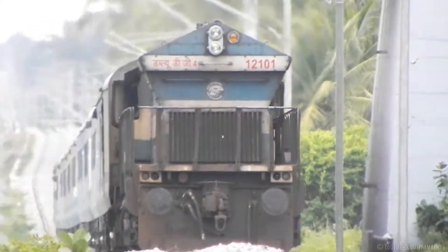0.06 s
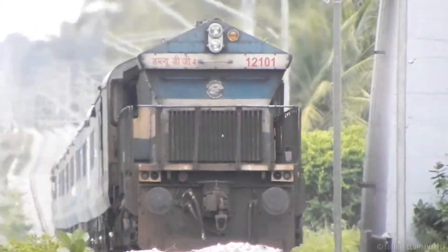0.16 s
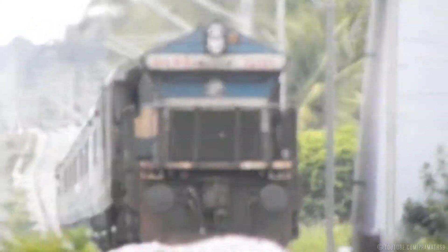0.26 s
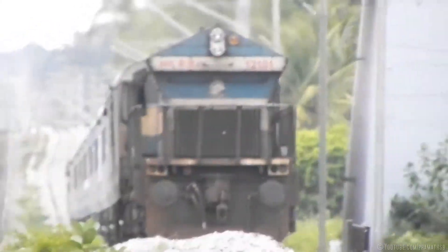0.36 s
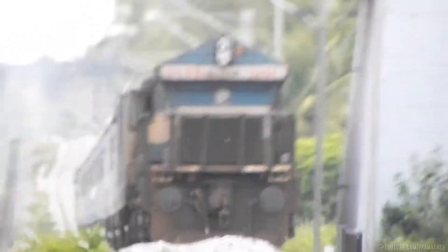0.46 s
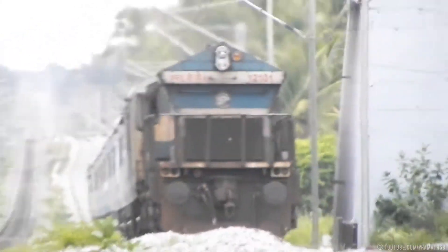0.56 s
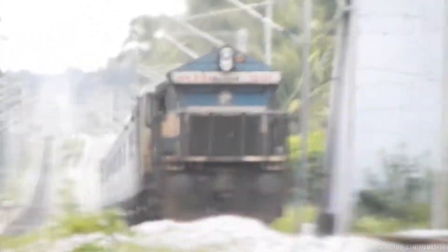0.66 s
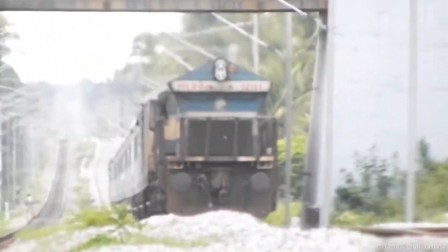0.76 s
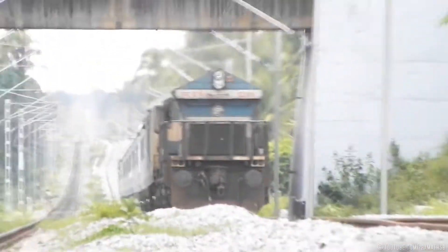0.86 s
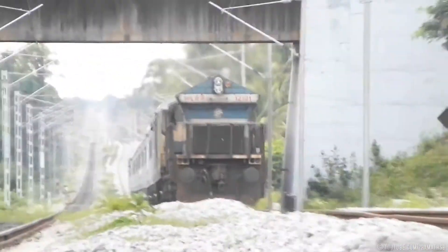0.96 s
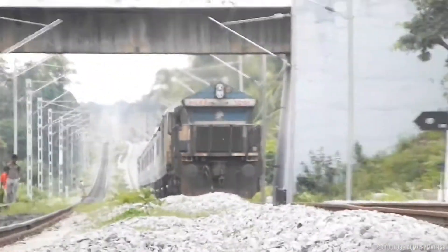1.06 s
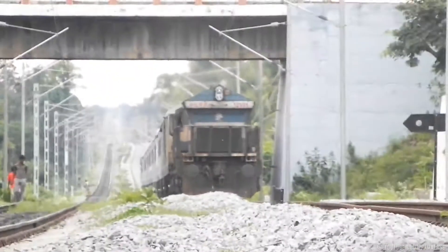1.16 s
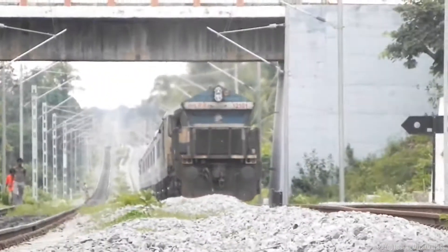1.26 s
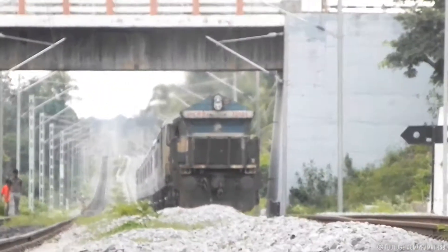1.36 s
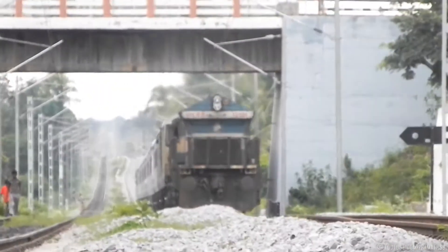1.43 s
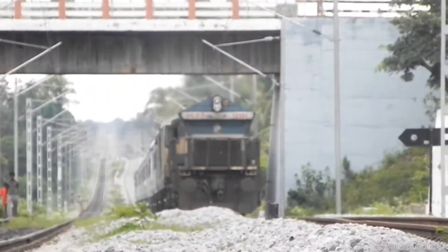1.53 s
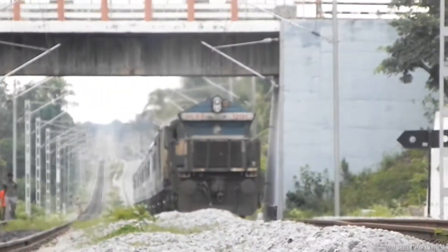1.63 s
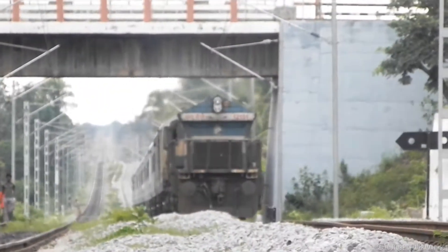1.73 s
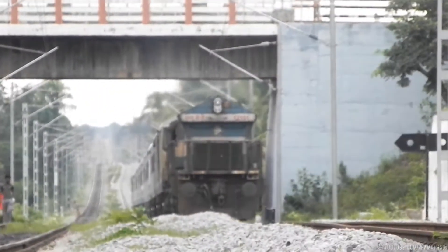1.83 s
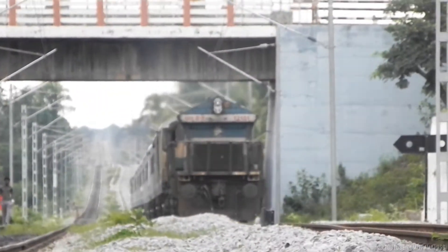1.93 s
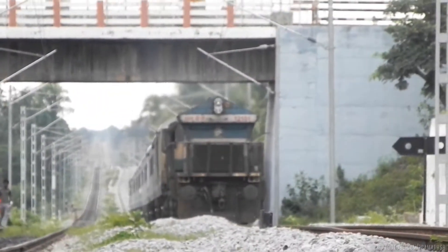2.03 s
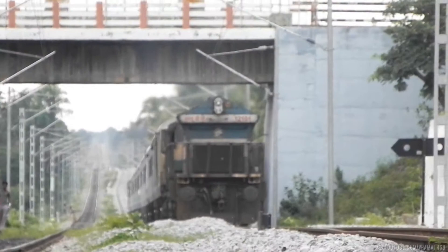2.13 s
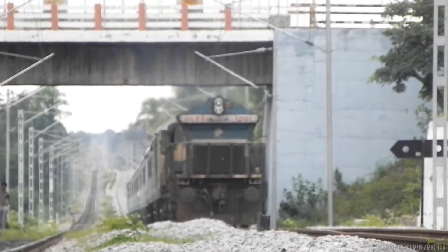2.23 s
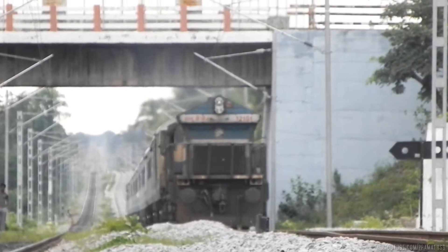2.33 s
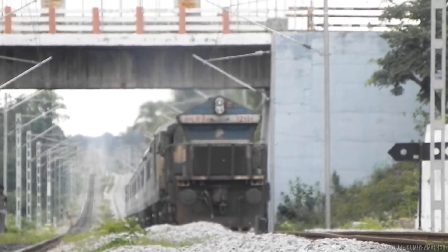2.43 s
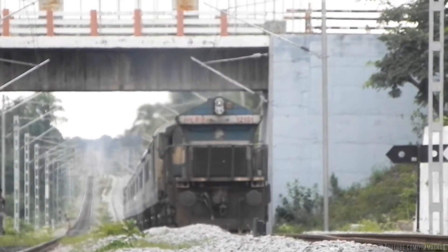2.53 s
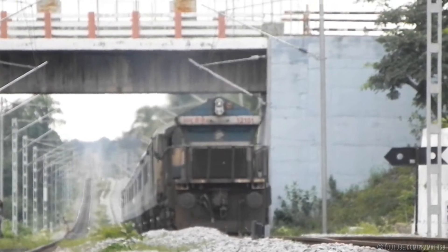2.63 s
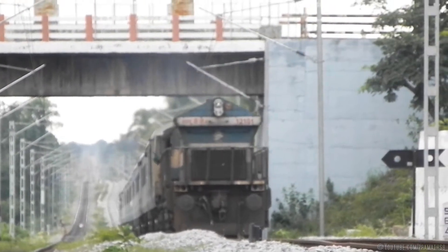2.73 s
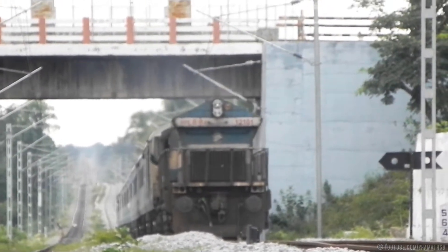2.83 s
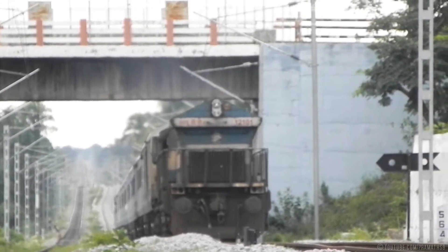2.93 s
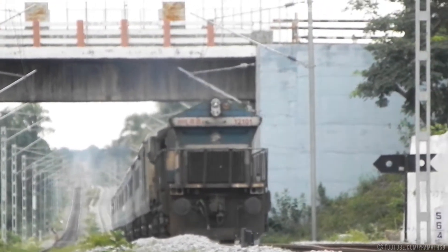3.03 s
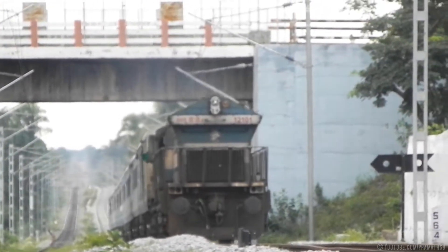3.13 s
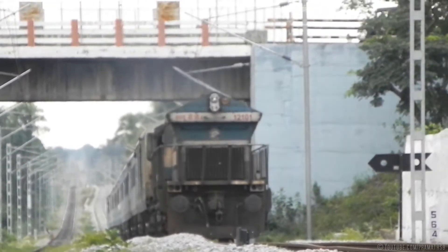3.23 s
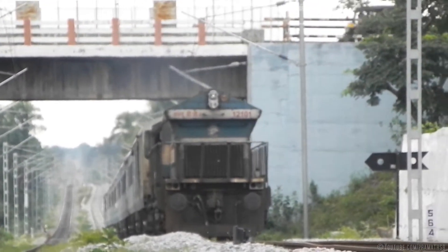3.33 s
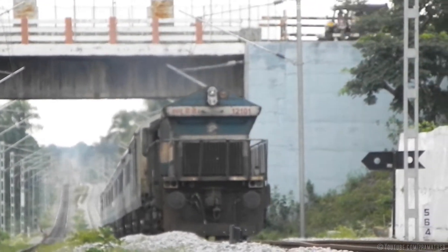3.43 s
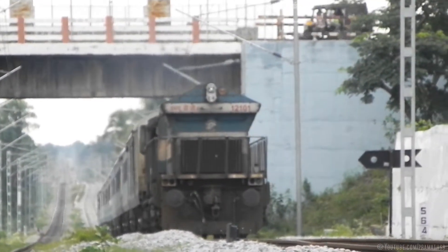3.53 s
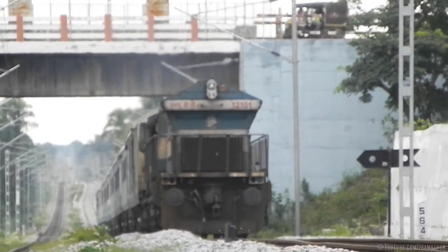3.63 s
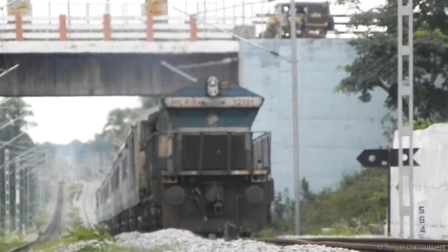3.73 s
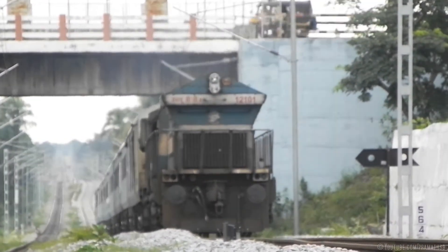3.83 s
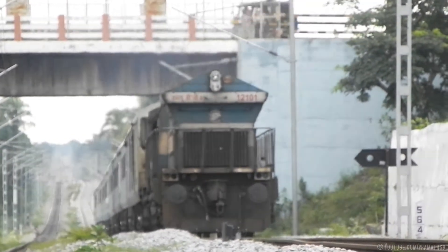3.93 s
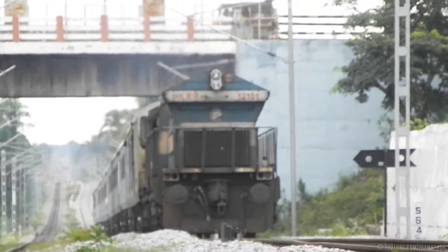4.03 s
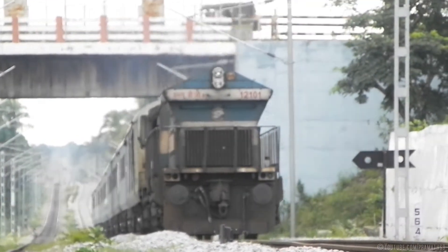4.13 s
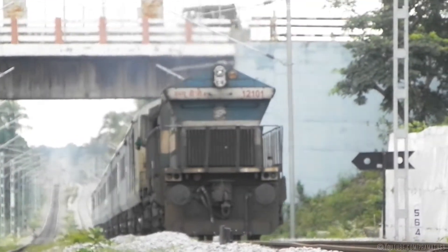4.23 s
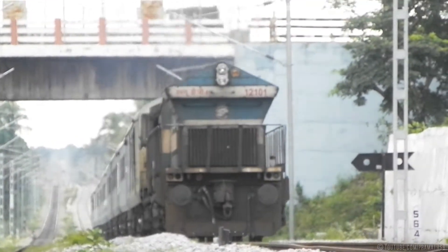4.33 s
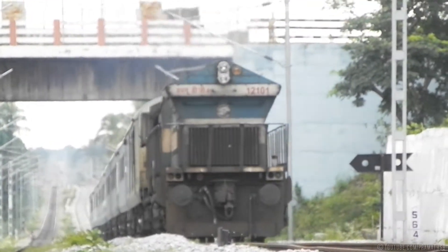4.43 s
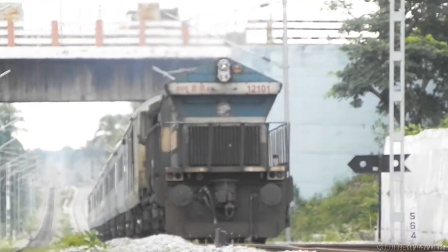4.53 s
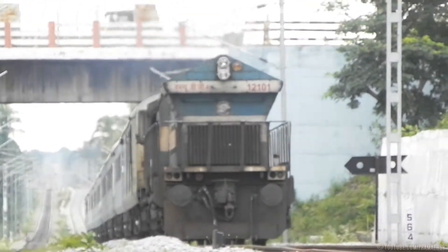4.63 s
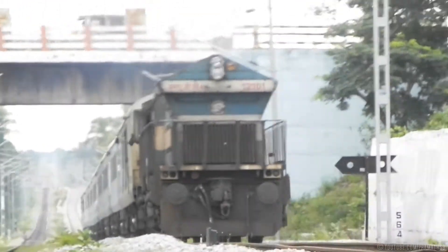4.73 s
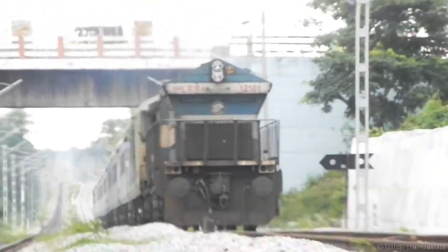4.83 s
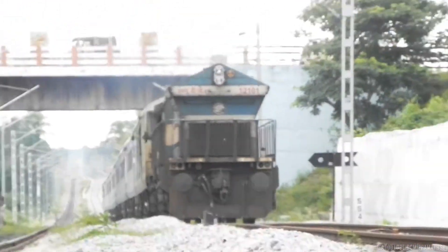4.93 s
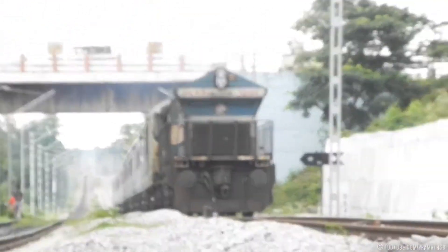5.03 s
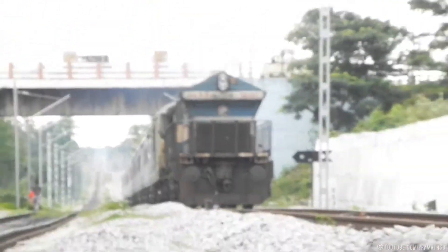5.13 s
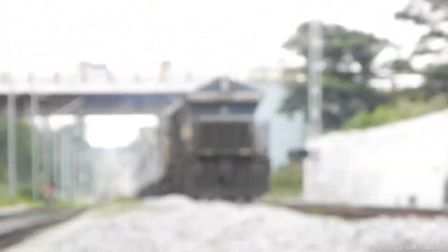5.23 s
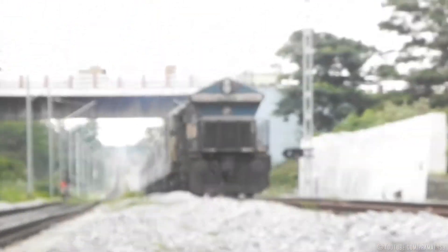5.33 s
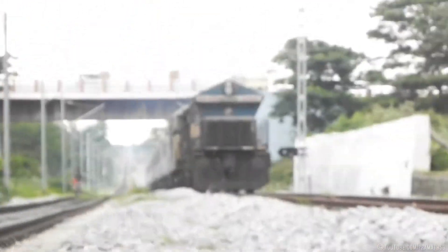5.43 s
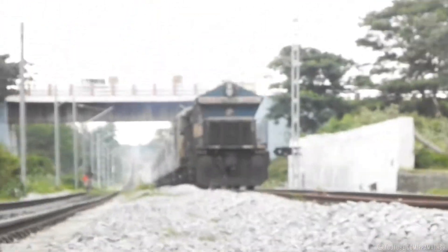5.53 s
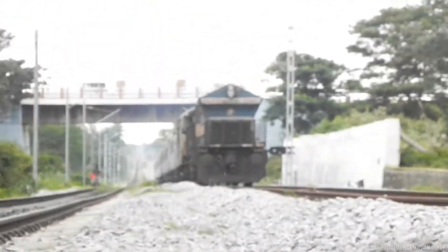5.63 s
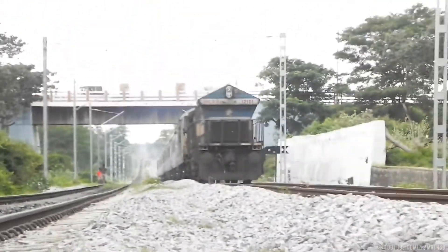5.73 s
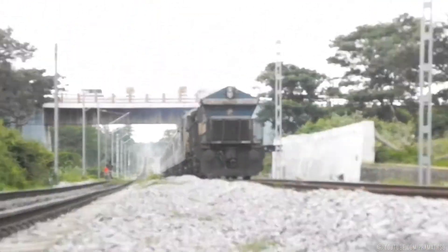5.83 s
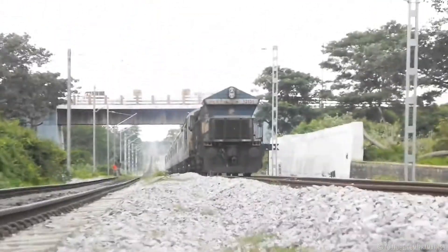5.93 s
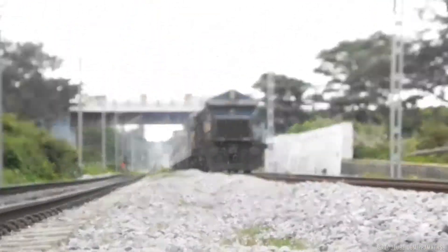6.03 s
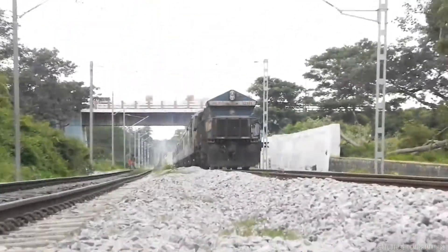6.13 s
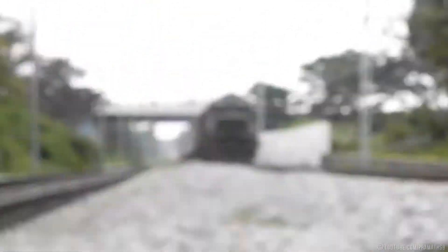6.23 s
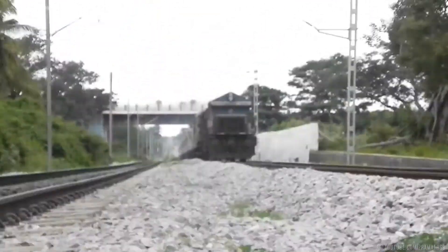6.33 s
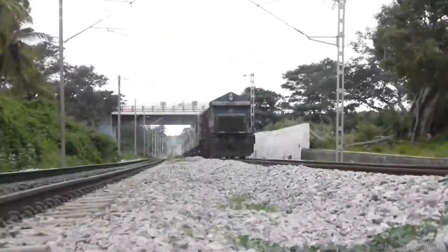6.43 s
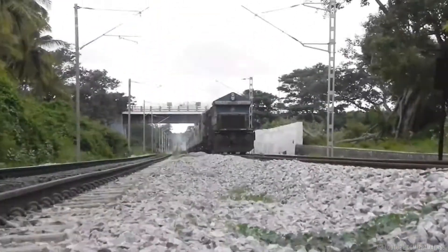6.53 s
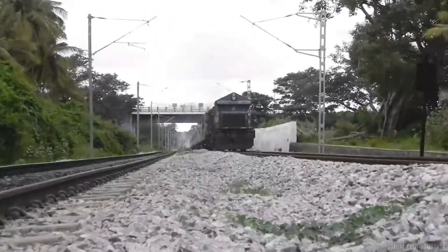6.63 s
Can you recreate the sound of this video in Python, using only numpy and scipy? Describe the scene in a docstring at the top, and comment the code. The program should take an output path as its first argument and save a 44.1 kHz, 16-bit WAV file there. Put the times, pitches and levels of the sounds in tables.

```python
"""On an open railway line a diesel locomotive drums closer, head on to a camera on the ballast.
Sums of crank harmonics make the exhaust beat; shaped noise makes the roar, wheel rush and rail hiss.
Wavering sines make whines of fans, gears and the zoom motor; noise bursts and dying modes make the lens
tick, click and scrape, and noise the rub of a hand on it. Two birds call faintly as gliding, echoing sines.
"""
import sys
import numpy as np
from scipy import signal
from scipy.fft import rfft, irfft, next_fast_len
from scipy.io import wavfile

SR = 44100
rng = np.random.default_rng(int(sys.argv[2]) if len(sys.argv) > 2 else 0)


def log_audio(samples):
    """Write samples as a 16-bit WAV file to the path given in sys.argv[1]."""
    # one column per channel
    frames = np.atleast_2d(samples).T
    # limit to full scale, then quantise
    limited = np.clip(frames, -1, 1)
    pcm = np.round(limited * 32767).astype(np.int16)
    wavfile.write(sys.argv[1], SR, pcm)


N = 294499
TIME = np.arange(N) / SR

# All noise spectra are relative: each noise is scaled to rms 1 before its layer's level applies.

# exhaust harmonics: crank_multiple, far_db, near_db (relative)
CRANK_ORDERS = [(3, -35, -20), (4, -5.5, -21), (5, -14, -5), (6, -6.5, 3), (7, -13, 5), (8, 3, 13),
                (9, -3, -2), (10, -2, -7), (12, -26, -15), (13, -16.5, -24)]
# gas rumble between the harmonics: frequency_hz, density_db_per_hz
RUMBLE_SPECTRUM = [(10, -40), (28, -40), (55, 0), (75, -10), (100, -2), (125, 1.5), (150, -3.5),
                   (170, -13.5), (190, -6), (215, -17), (260, -15), (400, -58), (900, -87)]
# the train's weight on the track: frequency_hz, density_db_per_hz
GROUND_SPECTRUM = [(10, -36), (28, -29), (52, -6), (65, 0.5), (90, -4), (200, -46), (600, -110)]
# deep bass of the track: time_s, level_db
GROUND_LEVEL = [(0, -37), (.6, -40), (.9, -31), (1.6, -39), (3.2, -38), (4.6, -31.5), (5.7, -29),
                (6.1, -35), (6.68, -35)]
# engine roar: frequency_hz, density_db_per_hz
ROAR_SPECTRUM = [(100, 11.5), (220, -8.5), (270, -2), (330, 0.5), (400, -14.5), (530, 9), (620, -2.5),
                 (760, 5), (920, 1), (1150, 6), (1400, 1.5), (1800, -13), (2600, -40), (6000, -67)]
# mean level of the roar: time_s, level_db
ROAR_LEVEL = [(0, -40.5), (.65, -38.5), (1.28, -32), (1.6, -33.5), (2.1, -38.5), (2.5, -37), (3.1, -35),
              (4.5, -32.5), (5.1, -32.5), (5.5, -29), (5.78, -25), (6.15, -25.5), (6.68, -25)]
# rush of fans and wheels: frequency_hz, density_db_per_hz
RUSH_SPECTRUM = [(150, 0.5), (300, 4.5), (400, 13.5), (550, 6), (610, -11), (900, -16), (1300, 2.5),
                 (2000, 3), (2900, 1), (4200, -4.5), (5300, -11), (6600, -9.5), (7600, -21), (15000, -54)]
# rail hiss: frequency_hz, density_db_per_hz
HISS_SPECTRUM = [(2000, -14), (5000, -9), (8500, 11.5), (10500, 4.5), (12000, 0), (14000, 3.5),
                 (16000, -10)]
# scatter from trees and walls: frequency_hz, density_db_per_hz
SCATTER_SPECTRUM = [(40, 9), (150, -10), (240, -9), (330, 3.5), (450, 9.5), (650, 0), (1300, 10), (1500, 0),
                    (2500, -5.5), (4000, -8.5), (6500, -17), (8000, -23.5), (11000, -38.5), (16000, -47)]
# slow swells, one arch each: start_s, length_s
SWELLS = [(0.35, 2.13), (4.572, 3.27)]
# bands that open and glide with the swells: crest_hz, width_octaves, depth_db, glide_octaves,
# deepest_arch_height (0-1), brevity (exponent: higher opens more briefly)
HOLLOWS = [(415, .16, 12, -.76, .86, 3), (1915, .33, 5.5, .99, .6, 3), (2020, .11, 11, .8, .73, 36),
           (5560, .14, 7, -.097, 1, 2)]
# whines and hums of fans, gears and the zoom motor:
# pitch_hz, waver_hz, mean_level_db, start_s, end_s, side_share_db
WHINES = [(121, 3, -32, .72, 1.5, -20), (186, 1.5, -44, 1.05, 1.9, -20), (480, 1.8, -48.5, 1.08, 4.85, 1),
          (531, 3.5, -47, 2.25, 5.9, -1), (530, 5, -43, 5.5, 8, -3), (563, 2.5, -52, 1.1, 7, -4),
          (755, 2.5, -40.5, 5.5, 8, -10), (960, 2, -51, 1, 3.1, -10), (1098, 2.2, -47.5, .95, 5.7, 2),
          (1095, 2.8, -39, 5.35, 8, -6)]
# loud lens ticks: start_s, knock_db, centre_hz, snap_db
TICKS = [(.015, -16.5, 890, -35.5), (.062, -14.5, 850, -38), (.124, -13, 700, -35), (.159, -15, 840, -33),
         (.209, -20, 895, -40), (.231, -16.5, 840, -33), (.256, -14.5, 840, -33), (.333, -21.5, 1000, -31),
         (.357, -16, 800, -21), (.37, -17.5, 670, -32), (.423, -15, 620, -37), (.446, -17, 550, -35),
         (.615, -18, 403, -32), (.946, -20, 980, -38), (1.453, -19, 1090, -32), (3.066, -20.5, 1230, -45),
         (4.86, -21, 2120, -27), (4.876, -12.5, 1560, -28), (4.896, -14, 646, -34), (4.958, -26, 1500, -33),
         (4.972, -18.5, 615, -36), (5.002, -16.5, 830, -27.5), (5.024, -25, 750, -40),
         (6.289, -11.5, 826, -32), (6.52, -9.5, 880, -27)]
# modes of the lens barrel: frequency_hz, level_db (relative), t60_s
BARREL_MODES = [(350, 13, 0.014), (416, -9, 0.014), (546, -5.5, 0.042), (670, -9, 0.0048), (742, -7, 0.026),
                (1090, -12, 0.015), (1300, 7, 0.018), (1634, 5.5, 0.019), (2550, -15, 0.014)]
# snap of a tick: frequency_hz, density_db_per_hz
SNAP_SPECTRUM = [(600, -30), (1800, 14), (3000, 15), (3650, 16), (4500, 7), (6500, 5.5), (9000, -7.5),
                 (13000, -11), (16000, -34)]
# dry part of a knock: frequency_hz, density_db_per_hz
CLACK_SPECTRUM = [(150, -23), (350, -4), (520, 15), (640, -3), (810, 8), (1000, -21), (1350, 7), (1700, -3),
                  (4000, -22), (9000, -60)]
# clicks of the zoom ring's ratchet: start_s, knock_db, ring_db, snap_db
CLICKS = [(0.673, -46, -45, -30), (.749, -31, -40, -43), (0.798, -27, -35, -36), (.857, -28, -36, -41),
          (0.909, -25, -40, -36), (.948, -23, -38, -36), (0.978, -36, -40, -28), (.982, -26, -31.5, -28),
          (1.005, -38, -37, -38), (1.054, -29, -40, -42), (1.102, -24, -37, -38), (1.153, -28, -37.5, -40),
          (1.207, -20.5, -41, -36), (1.25, -22, -36.5, -37), (5.061, -34, -36, -39), (5.177, -29, -36, -32)]
# mean modes of a ratchet tooth: frequency_hz, level_db (relative), t60_s
TOOTH_MODES = [(2150, -2, .016), (2550, 1, .018), (3520, 1, .02), (6800, -5, .014)]
# snap of a ratchet tooth: frequency_hz, density_db_per_hz
TOOTH_SNAP_SPECTRUM = [(800, -6), (2700, 13.5), (5300, 1), (6500, 7), (7700, -9), (9000, -1.5),
                       (10200, -10.5), (11200, -0.5), (13500, -19), (16000, -22)]
# scrapes sinking in pitch as the zoom ring turns: start_s, starting_level_db, length_s, pitch_hz
SCRAPES = [(0.444, -31, 0.022, 3840), (0.506, -31.5, 0.025, 3860), (0.542, -38, 0.015, 3870),
           (0.567, -38.5, .026, 3760), (0.642, -36, 0.016, 3870), (.703, -44, .024, 3820),
           (0.772, -39.5, .018, 3760), (0.821, -41, 0.0201, 3620), (0.846, -40, 0.011, 3600),
           (0.907, -38.5, 0.017, 3700), (1.473, -39, 0.0065, 3420)]
# mean modes of a scrape: pitch_multiple, level_db (relative), t60_s
SCRAPE_MODES = [(.55, -8, .006), (.72, -3, .007), (.88, -1, .009), (1, 3, .014), (1.09, -1, .011),
                (1.3, -10, .008), (1.5, -11, .01), (2.85, -26, .006)]
# hand rubbing on the lens: start_s, end_s, rub_db, brightness_db_per_octave, mean_faint_knock_db
RUBS = [(0.199, 0.602, -42.5, 4, -21.5), (0.547, 1.072, -43.5, 5, -27.5), (4.379, 4.816, -31.5, -3.5, -19),
        (4.716, 5.094, -32.5, 0, -41), (6.205, 6.61, -36, 0, -24)]
# rubbing before its brightness tilt: frequency_hz, density_db_per_hz
RUB_SPECTRUM = [(100, -2), (300, -12), (450, 0.5), (750, 7), (1300, 4), (2500, -1), (4000, -5.5),
                (7000, -18), (15000, -54)]
# small bird's peeps: start_s, length_s, starting_pitch_hz, starting_level_db (before the direct trim)
PEEPS = [(2.04, .11, 4470, -50.5), (2.53, .065, 4380, -46.5), (2.855, .108, 4410, -49),
         (3.245, .1, 4380, -49.5), (4.25, .07, 4350, -51)]
# far bird's rising whistles: start_s, length_s, starting_pitch_hz, level_db
WHISTLES = [(2.535, .115, 1370, -38.5), (2.78, .12, 1420, -37), (3.01, .135, 1420, -39)]

CRANK_HZ = 16.045
START_M, SPEED_M_PER_S = 111.3, 12.96
FAR_M, NEAR_M = 64, 18  # between these the exhaust turns from its far to its near colour
# layer levels: start_db, gain_db_per_halved_distance, crest_db, lull_db (the last two are changes)
DRUM = (-41, 9, -3, 0)
LOW_RUMBLE = (-39, 5.5, 2.5, 4)
WHEEL_RUSH = (-39.5, 3.5, -0.5, -3)
RAIL_HISS = (-67, 4.5, 5, -3.5)
SCATTER = (-34.5, 2.5, -1.5, -3.5)
CREST_POWER = 2.1  # narrows the swells where they change a level
# spells: start_s, end_s, fade_s
LULL = (0.75, 2.34, 0.43)  # treble and scatter sink, low rumble lifts
DRUM_DIP, DRUM_DIP_DB = (6.27, 6.95, 0.12), -11.5  # the strongest crank order dips
UNDER_BRIDGE, UNDER_BRIDGE_DB = (1.8, 4.1, 0.28), -1  # exhaust muffled while passing the bridge
# close by, the strongest order slips out of step and the beat fills in to a drone
DRONE_START_S, DRONE_ONSET_S, DRONE_SLIP_RAD = 5.5, .5, 1.25
SWAY_DB, SWAY_PERIOD_S, SWAY_CREST_S = 1, 0.67, 3.49  # the drumming waxes and wanes
ROAR_ROUGH_DB, ROAR_ROUGH_HZ = 1.8, 90
WHINE_WAVER_DB, WHINE_WAVER_HZ = 1.8, 3.5
LENS_PAN_DB = -4  # left minus right
CLACK_DB, CLACK_T60_S, BARREL_DB = -8, .026, -3  # levels relative to the knock
BLOW_DB, BLOW_PEAK_S, BLOW_WIDTH_S = -1.5, .0025, .0013  # level relative to the knock
RUB_FADE_S = 0.14
FAINT_PER_S, FAINT_HZ, FAINT_SNAP_DB, FAINT_SPREAD_DB = 20, 740, -61, 2  # FAINT_HZ is a median
TOOTH_KNOCK = (1270, 0.023)  # frequency_hz, t60_s
TOOTH_SNAP_T60_S = 0.016
DETUNE = .025  # relative spread of the tooth modes; scrape modes spread half as much
SCRAPE_SLIPS_PER_S, SCRAPE_FADE_DB, SCRAPE_RISE_S = 900, -4, .0005
PEEP_DROP, PEEP_QUAVER = .025, .008  # fractions of the pitch
PEEP_DIRECT_DB, BIRD_ECHO_T60_S = -.5, .7
WHISTLE_RISE, WHISTLE_BREAK = .11, .45  # fractions: pitch gained, amplitude lost amid the break
EDGE_HZ = 15800


def exhaust(turns):
    """Harmonic synthesis: crank orders add to one beat a turn, smeared by reflections far off, over gas rumble."""
    near = np.clip((FAR_M - distance()) / (FAR_M - NEAR_M), 0, 1)
    note = 0
    dip_db = DRUM_DIP_DB * spell(*DRUM_DIP)
    slip_rad = DRONE_SLIP_RAD * np.clip((TIME - DRONE_START_S) / DRONE_ONSET_S, 0, 1)
    for k, far_db, near_db in CRANK_ORDERS:
        strongest = k == 8
        waver_db = (1.2 - .5 * near) * wander(2.)
        waver_rad = (.33 - .2 * near) * wander(1.5)
        order_db = far_db + near * (near_db - far_db) + waver_db + strongest * dip_db
        smear_rad = (.3 - .2 * near) * (k - 8) ** 2
        phase = 2 * np.pi * k * turns + waver_rad + smear_rad - strongest * slip_rad
        note = note + gain_of(order_db) * np.cos(phase)
    sway_db = SWAY_DB * np.cos(2 * np.pi * (TIME - SWAY_CREST_S) / SWAY_PERIOD_S)
    drum = np.sqrt(2) * note * gain_of(level(DRUM) + sway_db + 0.33 * wander(40.0))
    rumble = noise(RUMBLE_SPECTRUM) * throb(turns, depth=0.06) * gain_of(level(LOW_RUMBLE))
    ground = noise(GROUND_SPECTRUM) * gain_of(np.interp(TIME, *np.transpose(GROUND_LEVEL)))
    muffling = gain_of(UNDER_BRIDGE_DB * spell(*UNDER_BRIDGE))
    return ports((drum + rumble) * muffling + ground, pan_db=1.26, lag=0.26)


def throb(turns, depth):
    """Periodic modulation: a swell once a crank turn, with a weaker one half a turn later."""
    return evened(np.exp(depth * (np.cos(2 * np.pi * turns) + 2.4 * np.cos(2 * np.pi * 2 * turns))))


def rolling(turns):
    """Broadband turbulence and friction: crank-pulsed roar, fan and wheel rush, rail hiss and diffuse scatter."""
    roar_db = np.interp(TIME, *np.transpose(ROAR_LEVEL)) + ROAR_ROUGH_DB * wander(ROAR_ROUGH_HZ)
    roar = noise(ROAR_SPECTRUM) * throb(turns, depth=0.0082) * gain_of(roar_db)
    rush = noise(RUSH_SPECTRUM) * gain_of(level(WHEEL_RUSH) + 0.77 * wander(29.0))
    hiss = noise(HISS_SPECTRUM) * gain_of(level(RAIL_HISS) + 1.1 * wander(40.))
    scatter = noise(SCATTER_SPECTRUM) * gain_of(level(SCATTER) + 1.1 * wander(9.9))
    return stereo(roar + rush + hiss, scatter)


def hollowed(x):
    """Time-varying band rejection: with each swell, bands hollow out, glide in pitch and fill in again."""
    hz, t, z = signal.stft(x, SR, nperseg=512)
    octave = np.log2(hz + 1)[:, None]
    arch, dip_db = swell(t), 0
    for crest_hz, width, depth_db, glide, deepest, brevity in HOLLOWS:
        centre = np.log2(crest_hz) - glide * (1 - arch)
        opening = abs(np.sin(np.pi / 2 * arch / deepest)) ** brevity
        dip_db = dip_db + depth_db * opening * np.exp(-.5 * ((octave - centre) / width) ** 2)
    return signal.istft(z * gain_of(-dip_db), SR, nperseg=512)[1][:N]


def whines():
    """Frequency modulation: random pitch waver widens sines to narrow bands, which fade in and out."""
    out = np.zeros((2, N))
    for hz, width, db, start, end, side_db in WHINES:
        fade = np.clip((TIME - start) / 0.24, 0, 1) * np.clip((end - TIME) / 0.59, 0, 1)
        mid, side = (evened(np.sin(2 * np.pi * np.cumsum(hz + width * wander(15.3)) / SR))
                     for _ in range(2))
        strength = gain_of(db + WHINE_WAVER_DB * wander(WHINE_WAVER_HZ))
        out += strength * fade * stereo(mid, gain_of(side_db) * side)
    return out


def lens():
    """Structure-borne sound: knocks, ratchet and scrapes reach the microphone ports through the camera's body."""
    out = placed(knocks() + ratchet() + scrapes(), LENS_PAN_DB)
    return out + gain_of(-6.) * echoes(out, t60=.045)


def knocks():
    """Stick-slip excitation: each slip of the zoom is a hard blow that snaps and rings the barrel's modes."""
    out, t = np.zeros((2, N)), np.arange(3000) / SR
    hz, mode_db, t60 = np.transpose(BARREL_MODES)[:, :, None]
    for s, knock_db, centre_hz, snap_db in slips():
        # a higher centre wakes higher modes; each port hears them at its own phase
        share = gain_of(mode_db - 4 * np.log2(hz / centre_hz) ** 2)
        start_turns = rng.random(hz.shape) + 0.059 * rng.standard_normal((2, *hz.shape))
        swing = np.sin(2 * np.pi * (hz * rng.normal(1, 0.044, hz.shape) * t + start_turns))
        ring = (share * gain_of(-60 * t / t60) * swing).sum(1) / np.linalg.norm(share)
        snap = noise(SNAP_SPECTRUM, size=len(t)) * gain_of(-60 * t / 0.024)
        clack = np.array([noise(CLACK_SPECTRUM, size=len(t)) for _ in range(2)])
        clack = clack * gain_of(CLACK_DB - 60 * t / CLACK_T60_S)
        rise = 1 - np.exp(-(t / 0.0009) ** 2)
        since_peak = t - BLOW_PEAK_S
        blow = np.exp(-(since_peak / BLOW_WIDTH_S) ** 2) * np.sin(2 * np.pi * centre_hz * since_peak)
        knock = gain_of(BLOW_DB) * blow + gain_of(BARREL_DB) * ring + clack
        add(out, s, rise * (gain_of(knock_db) * knock + gain_of(snap_db) * snap))
    return out


def slips():
    """Stick-slip friction: the loud ticks, and faint ones at random moments while the hand rubs."""
    faint = []
    for start, end, _, _, knock_db in RUBS:
        for s in np.arange(start + RUB_FADE_S, end - RUB_FADE_S, 1 / FAINT_PER_S):
            moment = s + rng.random() / FAINT_PER_S
            faint_db = knock_db + FAINT_SPREAD_DB * rng.standard_normal()
            faint.append((moment, faint_db, FAINT_HZ * 2 ** rng.normal(0, 0.25), FAINT_SNAP_DB))
    return TICKS + faint


def ratchet():
    """Impact excitation: each tooth gives a bright snap, a short knock and an uneven metallic ring."""
    out, t = np.zeros(N), np.arange(2000) / SR
    for s, knock_db, ring_db, snap_db in CLICKS:
        snap = noise(TOOTH_SNAP_SPECTRUM, size=len(t)) * gain_of(-60 * t / TOOTH_SNAP_T60_S)
        ring = sum(gain_of(db) * ringing(hz * rng.normal(1, DETUNE), t60, t)
                   for hz, db, t60 in TOOTH_MODES)
        knock = ringing(*TOOTH_KNOCK, t)
        add(out, s, gain_of(knock_db) * knock + gain_of(ring_db) * ring + gain_of(snap_db) * snap)
    return out


def scrapes():
    """Repeated stick-slip: a quick, fading run of tiny slips rings the metal of the zoom ring."""
    out, t = np.zeros(N), np.arange(1200) / SR
    rise = 1 - np.exp(-(t / SCRAPE_RISE_S) ** 2)
    for s, db, length, hz in SCRAPES:
        size = round(length * SR)
        tiny = rng.standard_normal(size) * (rng.random(size) < SCRAPE_SLIPS_PER_S / SR)
        tiny[0] = 2  # a strong first slip
        ring = sum(gain_of(mode_db) * ringing(hz * k * rng.normal(1, DETUNE / 2), t60, t)
                   for k, mode_db, t60 in SCRAPE_MODES)
        fade = gain_of(SCRAPE_FADE_DB * np.arange(size) / size)
        run = signal.fftconvolve(tiny * fade, rise * ring)
        add(out, s, gain_of(db + SCRAPE_FADE_DB / 2) * run / np.std(run[:size]))
    return out


def rubbing():
    """Sliding friction: the hand's noise on the lens, brighter or duller with its grip, independent at each port."""
    out = np.zeros((2, N))
    for start, end, db, tilt_db, _ in RUBS:
        colour = [(hz, hz_db + tilt_db * np.log2(hz)) for hz, hz_db in RUB_SPECTRUM]
        first, size = round(start * SR), round((end - start) * SR)
        stroke = np.array([noise(colour, size=size), noise(colour, size=size)])
        fade = signal.windows.tukey(size, 2 * RUB_FADE_S / (end - start))
        add(out, first / SR, gain_of(db) * stroke * fade)
    return out


def birds():
    """Tonal glides with reverberation: swelling, dropping peeps and far upward-breaking whistles echo in trees."""
    peeps, whistles = np.zeros((2, N))
    for s, length, hz, db in PEEPS:
        u = np.linspace(0, 1, round(length * SR))
        quaver = PEEP_QUAVER * noise([(10, -2), (60, 9), (200, -46)], size=len(u))
        angle = 2 * np.pi * np.cumsum(hz * (1 - 0.0101 * u - PEEP_DROP * u ** 5 + quaver)) / SR
        loudness = gain_of(db + 10 * u) * signal.windows.tukey(len(u), .2)
        overtone = gain_of(-13.5) * (1 - u ** 6) * np.sin(2 * angle)
        add(peeps, s, loudness * (np.sin(angle) + overtone))
    for s, length, hz, db in WHISTLES:
        u = np.linspace(0, 1, round(length * SR))
        step = (1 + np.tanh(7 * (u - .5))) / 2
        loudness = signal.windows.tukey(len(u), .3) * (1 - WHISTLE_BREAK * np.sin(np.pi * step))
        angle = 2 * np.pi * np.cumsum(hz * (1 + WHISTLE_RISE * step)) / SR
        add(whistles, s, gain_of(db) * loudness * np.sin(angle))
    reverberation = echoes(peeps + gain_of(-5) * whistles, t60=BIRD_ECHO_T60_S)
    return gain_of(PEEP_DIRECT_DB) * peeps + whistles + reverberation


def distance():
    """Uniform motion: metres to the approaching locomotive, at least 1."""
    return np.maximum(START_M - SPEED_M_PER_S * TIME, 1)


def level(layer):
    """Distance law: dB rise with each halving of the distance, plus changes in the swells and the lull."""
    start_db, halving_db, crest_db, lull_db = layer
    approach_db = halving_db * np.log2(START_M / distance())
    swell_db = crest_db * abs(swell(TIME)) ** CREST_POWER
    return start_db + approach_db + swell_db + lull_db * spell(*LULL)


def swell(t):
    """Half-sine envelope: height of the slow swells, 0-1."""
    return sum(np.sin(np.pi * np.clip((t - start) / length, 0, 1)) for start, length in SWELLS)


def spell(start, end, fade):
    """Trapezoidal envelope: rises from 0 to 1 after start and falls back before end."""
    return np.clip(np.minimum(TIME - start, end - TIME) / fade, 0, 1)


def wander(rate_hz):
    """Low-pass random modulation: rms 1, up to about the given rate."""
    count = 4096
    f = np.fft.rfftfreq(count, N / SR / count)
    slow = irfft(rfft(rng.standard_normal(count)) * np.exp(-.5 * (f / rate_hz) ** 2))
    return np.interp(TIME, np.linspace(0, N / SR, count), evened(slow))


def noise(spectrum, size=N):
    """Spectral shaping: white noise filtered to the given spectrum and scaled to rms 1."""
    f, db = np.transpose(spectrum)
    n = next_fast_len(size)
    shape = gain_of(np.interp(np.log(np.fft.rfftfreq(n, 1 / SR) + 1), np.log(f), db))
    return evened(irfft(rfft(rng.standard_normal(n)) * shape, n)[:size])


def ringing(hz, t60, t):
    """Damped oscillation: one struck mode, dying by 60 dB in t60 seconds."""
    return gain_of(-60 * t / t60) * np.sin(2 * np.pi * hz * t)


def echoes(x, t60):
    """Diffuse reverberation: convolution with decaying noise, different at each ear."""
    t = np.arange(SR // 2) / SR
    tail = rng.standard_normal((2, len(t))) * gain_of(-60 * t / t60)
    return signal.fftconvolve(np.atleast_2d(x), tail / np.linalg.norm(tail[0]), axes=1)[:, :N]


def ports(x, pan_db, lag):
    """Interchannel phase: the left microphone port hears x pan_db louder and lag radians behind the right."""
    analytic = signal.hilbert(x, next_fast_len(N))[:N]
    return placed((analytic * np.exp(.5j * lag * np.array([[-1], [1]]))).real, pan_db)


def placed(x, pan_db):
    """Level-difference panning: left exceeds right by pan_db."""
    return x * gain_of([[pan_db / 2], [-pan_db / 2]])


def stereo(mid, side):
    """Sum and difference: left and right from their common and opposite parts."""
    return np.array([mid + side, mid - side])


def add(mix, s, sound):
    """Superposition: mixes a sound in at time s."""
    part = mix[..., max(round(s * SR), 0):][..., :sound.shape[-1]]
    part += sound[..., :part.shape[-1]]


def gain_of(db):
    """Logarithmic level: decibels to amplitude."""
    return 10 ** (np.asarray(db) / 20)


def evened(x):
    """Power normalization: scales to rms 1."""
    return x / np.sqrt(np.mean(x ** 2) + 1e-20)


def scene():
    """Superposition of the locomotive ahead, the lens close by and the birds around."""
    turns = CRANK_HZ * TIME
    engine = exhaust(turns) + whines()
    left, right = rolling(turns) + rubbing()
    # only the part common to both sides is hollowed
    broadband = stereo(hollowed((left + right) / 2), (left - right) / 2)
    return engine + broadband + lens() + birds()


def record(dry):
    """Band limitation: a linear-phase low-pass filter removes the highest treble."""
    lowpass = signal.firwin(511, EDGE_HZ, window=("kaiser", 9), fs=SR)
    return signal.oaconvolve(dry, lowpass[None], "same")


dry = scene()
out = record(dry)
log_audio(out)
```